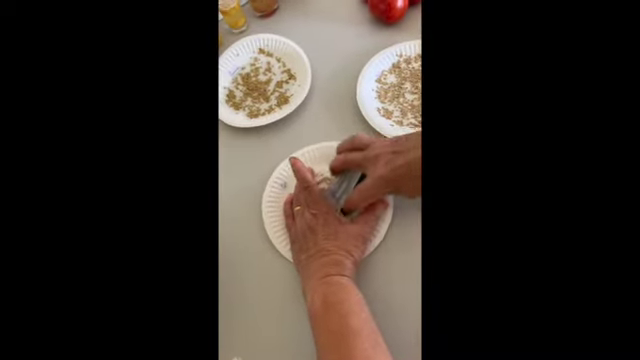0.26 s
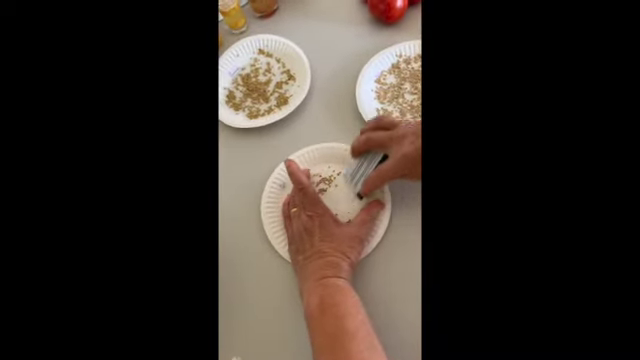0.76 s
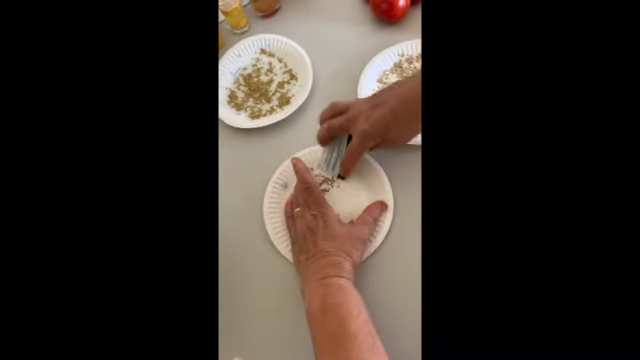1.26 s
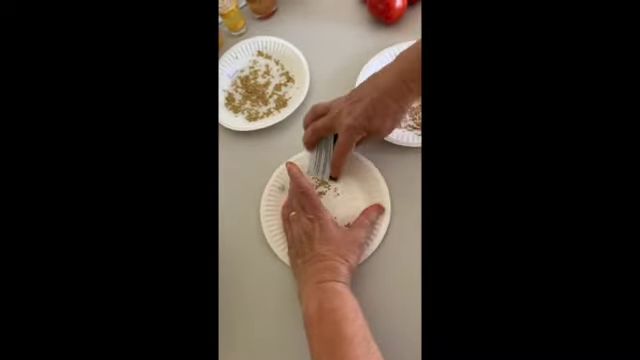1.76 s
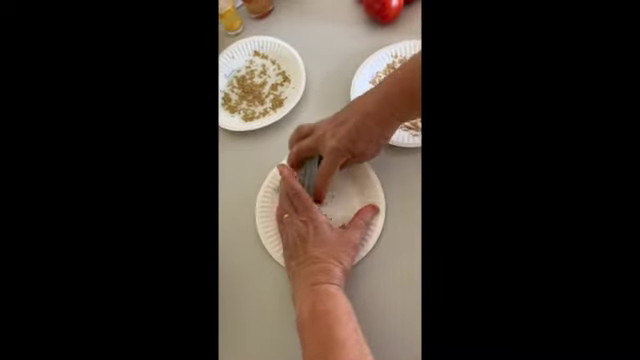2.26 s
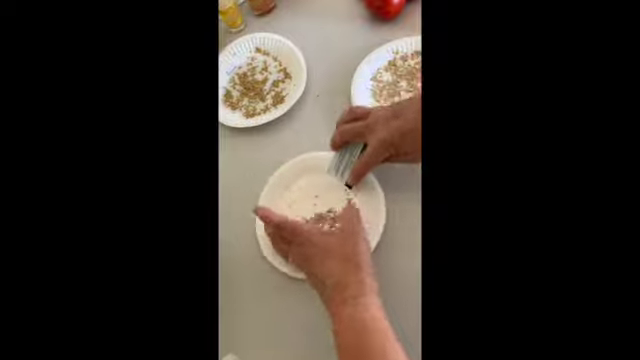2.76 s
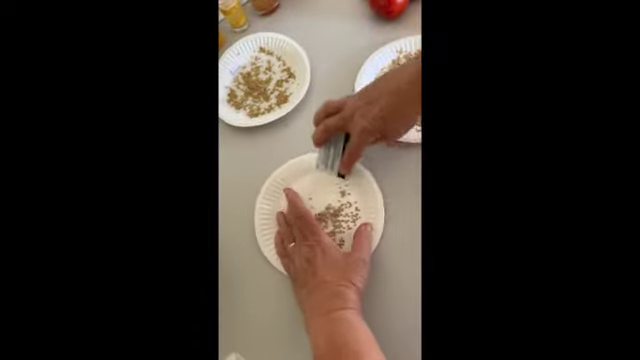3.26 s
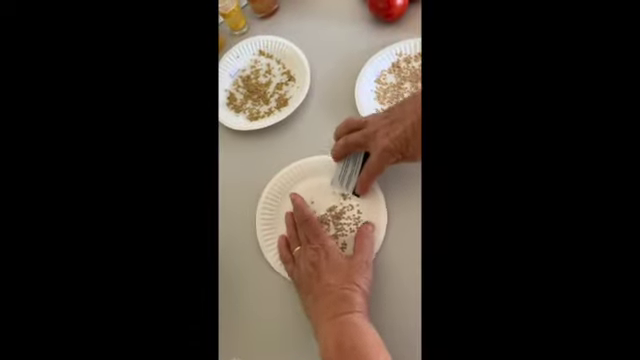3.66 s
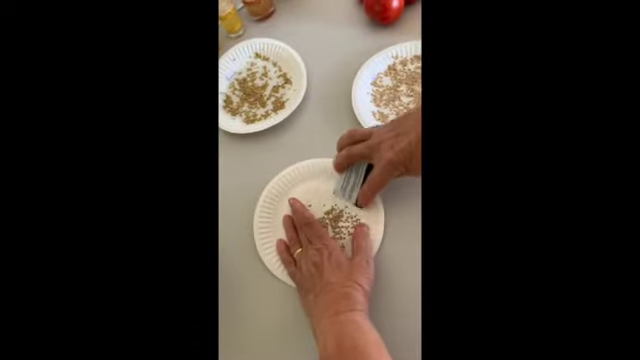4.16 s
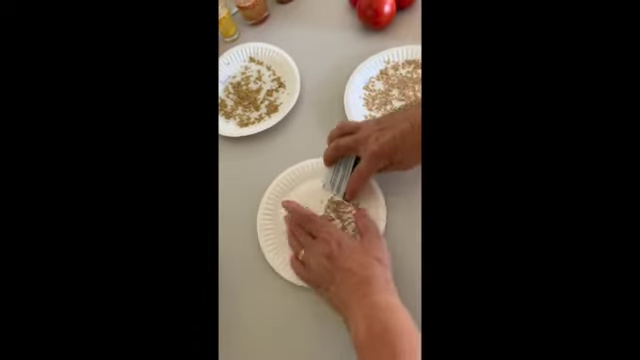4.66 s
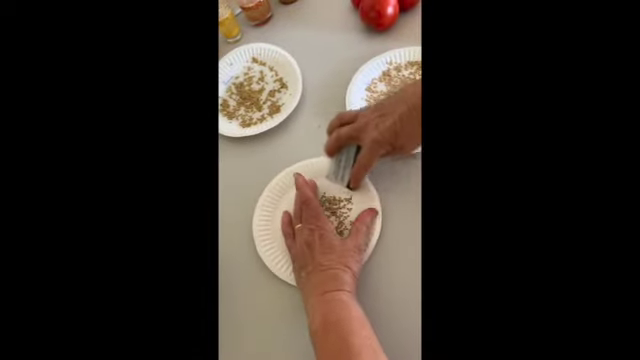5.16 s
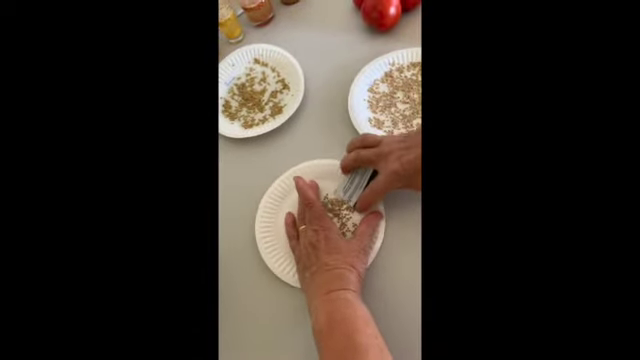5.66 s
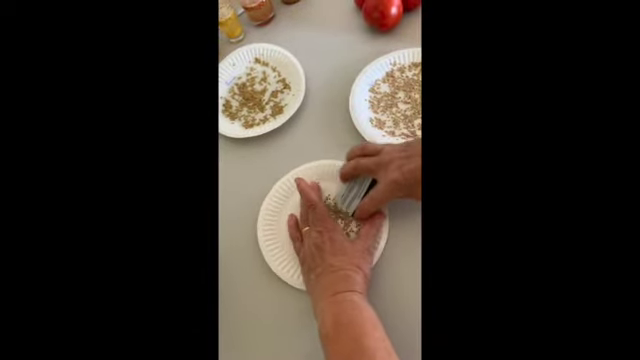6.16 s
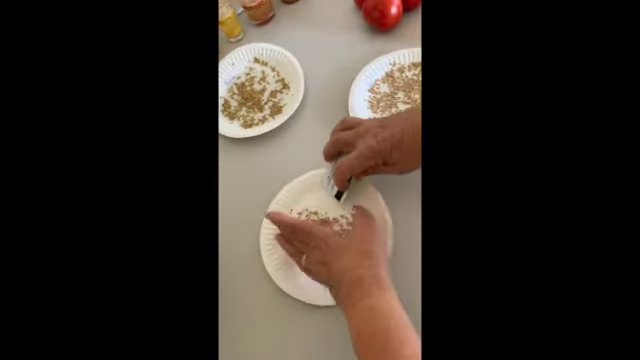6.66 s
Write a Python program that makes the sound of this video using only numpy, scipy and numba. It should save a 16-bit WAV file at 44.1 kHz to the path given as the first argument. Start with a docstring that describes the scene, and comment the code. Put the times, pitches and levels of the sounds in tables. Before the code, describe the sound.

Brisk raspy card scrapes on a paper plate, dried seeds cracking loose and the plate thudding on a table, then lighter strokes, then firm ones again.

```python
"""In a small, quiet, faintly humming room a stiff plastic card rests on a paper plate, held on a table by a hand.
First come brisk strokes: tiny slips hiss at the card's edge, coarser catches rasp in the paper, and some slips
lock into brief squeaks. As the edge ploughs into dried seeds the plate thuds, the card knocks, seeds snap loose
and the plate thumps back. From about 2.4 s most strokes are lighter and some make the plate groan; firm ones
return from 5.5 s, and light ones end it. Filtered noise and short sines make all layers; a close phone hears them."""
import sys
import numpy as np
from scipy import signal
from scipy.fft import rfft, irfft, next_fast_len
from scipy.io import wavfile
from scipy.ndimage import uniform_filter1d
from numba import njit

SR = 44100
rng = np.random.default_rng(int(sys.argv[2]) if len(sys.argv) > 2 else 0)


def bounce(signal):
    """Save signal as a 16-bit WAV file at the path given by the first command-line argument."""
    frames = np.transpose(np.atleast_2d(signal))
    limited = np.clip(frames, -1, 1)
    pcm = np.round(limited * 32767).astype(np.int16)
    wavfile.write(sys.argv[1], SR, pcm)


N = 304851
TIME_S = np.arange(N) / SR


def undb(db):
    """Decibels to gain."""
    return 10 ** (np.asarray(db) / 20)


def unit(x):
    """Scale to rms 1."""
    return x / np.sqrt(np.mean(x ** 2) + 1e-18)


def add(track, start_s, sound):
    """Mix a sound into a track at a given time."""
    i = max(int(start_s * SR), 0)
    track[i:i + len(sound)] += sound[:max(N - i, 0)]


def contour(points, hz):
    """Read (Hz, dB) points on a log-frequency axis."""
    point_hz, db = np.transpose(points)
    return np.interp(np.log(hz + 1), np.log(point_hz), db)


def colour(x, points, tilt_db=0):
    """Minimum-phase filter with the given spectrum; 0.056 of the tilt applies up to 4.5 kHz, 0.95 from 13 kHz."""
    size = next_fast_len(len(x) + 2048, real=True) // 2 * 2
    hz = np.fft.rfftfreq(size, 1 / SR)
    db = contour(points, hz) + tilt_db * contour([(4500, 0.056), (13000, 0.95)], hz)
    # folding the cepstrum makes the filter causal
    cepstrum = irfft(np.log(undb(db)))
    cepstrum[1:size // 2] *= 2
    cepstrum[size // 2 + 1:] = 0
    response = np.exp(rfft(cepstrum))
    return irfft(rfft(x, size) * response, size)[:len(x)]


def resonate(x, hz, width_hz):
    """One resonance, gain 1 at its centre."""
    return signal.lfilter(*signal.iirpeak(hz, hz / width_hz, SR), x)


@njit
def sweep(x, hz, width_hz):
    """A resonance whose centre moves: state-variable band-pass, gain 1 at the centre."""
    y, band, low = np.empty(len(x)), 0., 0.
    for i in range(len(x)):
        g, k = np.tan(np.pi * hz[i] / SR), width_hz / hz[i]
        v = (band + g * (x[i] - low)) / (1 + g * (g + k))
        band, low, y[i] = 2 * v - band, low + 2 * g * v, k * v
    return y


def walk(rate_per_s):
    """Smooth random drift about 0 with a standard deviation near 0.3."""
    k = max(int(SR / rate_per_s), 2)
    steps = np.repeat(rng.standard_normal(N // k + 1), k)[:N]
    return 0.36 * uniform_filter1d(steps, k)


def slips(rate_per_s, spread_db, size=N):
    """Tiny slips at random moments; a positive spread makes a few large, a negative one makes a few small."""
    happens = rng.random(size) < rate_per_s / SR
    force = undb(spread_db * np.minimum(rng.exponential(size=size), 4))
    return unit(happens * force * rng.standard_normal(size))


def card_ring(t60_s, tick, size=2048):
    """The card's answer to one slip: a sharp tick, then a dense, short ring."""
    decay = undb(-60 * np.arange(size) / SR / t60_s)
    response = unit(rng.standard_normal(size) * decay) / np.sqrt(size)
    response[0] += tick
    return response


def moving_contact(grit, t60_s, size=4096):
    """The card rings a little differently at each spot that the contact passes."""
    out, fade = np.zeros(N), np.sqrt(np.hanning(size))
    padded = np.pad(grit, (0, size))
    for i in range(0, N, size // 2):
        spot = padded[i:i + size] * fade
        add(out, i / SR, signal.fftconvolve(spot, card_ring(t60_s, tick=0.33)))
    return out


# Rumble spectrum. Each row: frequency in Hz, level in dB per Hz.
RUMBLE_COLOUR = [(25, -10), (50, 5), (90, -1.5), (150, -8), (290, -6), (450, -16), (900, -25.5),
                 (2200, -35.5), (5000, -54), (15500, -87)]
# Faint hum of a household appliance. Each row: frequency in Hz, mean level in dB rms.
APPLIANCE_HUM = [(101, -68), (151, -63), (204, -65.5), (253, -69), (297, -70)]


def room_tone():
    """Low rumble, largely shared by both microphones, plus hum partials that waver in level and phase."""
    common = unit(colour(rng.standard_normal(N), RUMBLE_COLOUR)) * undb(0.51 * walk(1.48))
    own = np.array([unit(colour(rng.standard_normal(N), RUMBLE_COLOUR)) for _ in range(2)])
    hum = np.zeros(N)
    for hz, db in APPLIANCE_HUM:
        level = np.sqrt(2) * undb(db + 0.74 * walk(3.2))
        hum += level * np.sin(2 * np.pi * hz * TIME_S + walk(5.6))
    return undb(-56) * (common + 0.46 * own) + hum


def slide(start_s, length_s):
    """One pass of the hand: the card speeds up and slows down again; loudness grows with speed."""
    progress = np.clip((TIME_S - start_s) / length_s, 0, 1)
    return 4 * progress * (1 - progress)


RISE_SHARE, FADE_FROM_SHARE, CRUNCH_T60_S = 0.42, 0.095, 0.31  # shares of the ploughing time


def crunch(start_s, length_s):
    """Friction builds as seeds pile up before the edge; a decay sets in during the rise and outlasts it."""
    t = TIME_S - start_s
    rise = np.clip(t / (RISE_SHARE * length_s), 0, 1)
    faded = np.clip((t - FADE_FROM_SHARE * length_s) / CRUNCH_T60_S, 0, 2)
    return rise * undb(-60 * faded)


# The card runs up over bare paper, ploughs into seeds and shoves the plate.
# Each row: meets the seeds in s, run-up in s, ploughing in s, plate's lowest bend in Hz, thud in dB,
# hollow knock in dB, sliding hiss in dB, crunch in dB, pitch of the card's edge in Hz.
STROKE_PASSES = [(.076, 0.091, 0.032, 123, -32.5, -35.5, -35, -28.5, 3430),
                 (.395, 0.084, 0.048, 114, -32.5, -36, -34, -30, 3020),
                 (0.828, 0.074, 0.087, 107, -52.5, -61, -49.5, -51, 5700),
                 (1.128, .1, 0.052, 100, -26.5, -36.5, -43, -27.5, 5630),
                 (1.433, 0.069, 0.029, 125, -32, -37, -35.5, -37, 5600),
                 (1.696, 0.04, 0.066, 107, -31, -33, -34.5, -24, 5600),
                 (1.997, 0.064, 0.024, 82, -32, -37.5, -32, -26, 6060),
                 (2.526, 0.14, 0.037, 109, -63, -55, -44.5, -61, 5650),
                 (2.928, 0.035, 0.02, 84, -56.5, -63, -55.5, -70, 5440),
                 (3.21, 0.17, 0.031, 137, -45.5, -55.5, -52.5, -64, 5450),
                 (3.283, 0.12, 0.095, 131, -42.5, -40, -46, -62, 5450),
                 (3.348, 0.06, 0.033, 99, -39, -39.5, -39.5, -47, 5300),
                 (3.614, 0.049, 0.039, 74.4, -40.5, -46, -40.5, -42, 4170),
                 (3.921, 0.057, 0.042, 99, -41.5, -45, -38, -39.5, 6100),
                 (4.232, 0.081, 0.034, 78.6, -37, -43.5, -40, -31.5, 5750),
                 (4.54, 0.032, 0.013, 123, -46, -51, -47, -72, 4250),
                 (5.231, 0.045, 0.025, 121, -45, -50, -41.5, -43.5, 5100),
                 (5.51, 0.056, 0.043, 90, -31.5, -39.5, -40, -26.5, 4900),
                 (5.83, 0.066, 0.05, 78.5, -32, -40.5, -35, -28, 4330),
                 (6.1, 0.061, 0.066, 99, -32.5, -40.5, -38.5, -28, 6250),
                 (6.4, 0.032, 0.036, 102, -43.5, -53.5, -57, -68, 5460),
                 (6.871, 0.012, 0.027, 94, -49, -55, -43.5, -67, 4070)]
# The card is drawn back, or brushes lightly over the paper.
# Each row: start in s, length in s, hiss in dB, rasp of the plate in dB, pitch of the card's edge in Hz.
SWEEP_PASSES = [(0.177, 0.14, -38.5, -48, 5800), (0.459, 0.2, -43.5, -50, 5400),
                (0.88, 0.17, -54.5, -67, 5930), (1.217, 0.15, -39.5, -47, 5800),
                (1.51, 0.15, -47.5, -50.5, 5700), (1.842, 0.11, -39.5, -43, 6330),
                (2.106, .19, -48, -53.5, 6140), (2.287, 0.12, -44.5, -55, 5800),
                (2.377, 0.3, -46, -74, 5900), (2.596, 0.36, -54, -68.5, 5340),
                (2.925, 0.13, -57, -67, 5640), (3.405, 0.17, -50.5, -53, 4400),
                (3.736, 0.13, -45.5, -52, 6600), (4.019, 0.13, -44.5, -50.5, 6100),
                (4.349, 0.25, -43.5, -53, 4250), (4.522, 0.14, -41, -77, 4000),
                (4.636, 0.15, -58, -67.5, 4300), (4.845, 0.12, -59.5, -70, 3800),
                (4.942, 0.25, -45, -57.5, 4020), (5.336, 0.11, -52.5, -59.5, 5160),
                (5.641, 0.13, -44.5, -50, 4730), (5.918, 0.13, -47.5, -50.5, 4850),
                (6.127, 0.11, -41, -46.5, 6560), (6.25, 0.19, -40.5, -53.5, 5640),
                (6.391, 0.16, -38, -58.5, 5240), (6.489, 0.17, -49.5, -71, 4900),
                (6.736, 0.029, -60, -74, 3900)]
RESTING_HISS_DB, RESTING_RASP_DB = -67, -92  # the card never lies quite still
FOLLOW_THROUGH_S = 0.03  # the card slides on after ploughing
RUN_UP_RASP_DB = -7.5  # against the run-up's hiss
RASP_EXPONENT = 0.65  # in a sweep the rasp swells less than the hiss
TURN_S = 0.02  # the hand eases in and out of each sweep


def friction():
    """Levels of the edge's hiss and the plate's rasp in dB; all passes add in power."""
    hiss, rasp = undb(RESTING_HISS_DB) ** 2, undb(RESTING_RASP_DB) ** 2
    for meets_s, run_up_s, plough_s, _, _, _, slide_db, crunch_db, _ in STROKE_PASSES:
        sliding = undb(slide_db) * slide(meets_s - run_up_s, run_up_s + plough_s + FOLLOW_THROUGH_S)
        ploughing = undb(crunch_db) * crunch(meets_s, plough_s)
        hiss = hiss + sliding ** 2 + ploughing ** 2
        rasp = rasp + (undb(RUN_UP_RASP_DB) * sliding) ** 2 + ploughing ** 2
    for start_s, length_s, hiss_db, rasp_db, _ in SWEEP_PASSES:
        sliding = np.abs(uniform_filter1d(slide(start_s, length_s), int(TURN_S * SR)))
        hiss = hiss + (undb(hiss_db) * sliding) ** 2
        rasp = rasp + (undb(rasp_db) * sliding ** RASP_EXPONENT) ** 2
    return 10 * np.log10(hiss), 10 * np.log10(rasp)


def edge_pitch():
    """The grip sets the pitch of the card's free edge for each pass; it glides from one to the next."""
    grips = [(meets_s, hz) for meets_s, *_, hz in STROKE_PASSES]
    grips += [(start_s + length_s / 2, hz) for start_s, length_s, *_, hz in SWEEP_PASSES]
    return np.interp(TIME_S, *np.transpose(sorted(grips)))


# Spectrum of the edge's hiss. Each row: frequency in Hz, level in dB per Hz.
EDGE_HISS_COLOUR = [(900, -24), (2150, -8), (2900, 0), (4500, -1), (6500, -1.5), (9000, -3), (11000, -6.5),
                    (15500, -10)]


def edge_hiss(hiss_db):
    """Slips of the edge ring the card; a light touch sounds its free edge, pressure brightens it."""
    unevenness = undb(1.4 * walk(140) + 1.2 * walk(30))
    hiss = moving_contact(slips(3000, spread_db=3.3) * unevenness, t60_s=0.061)
    hiss = hiss / np.sqrt(uniform_filter1d(hiss ** 2, 1800) + 1e-9)  # even out the level over 41 ms
    edge = unit(sweep(hiss, edge_pitch(), width_hz=470.0))
    pressure = np.clip((hiss_db + 56.5) / 22, 0, 1)
    light = unit(unit(colour(hiss, EDGE_HISS_COLOUR, tilt_db=-1.5)) + 0.5 * edge)
    hard = unit(unit(colour(hiss, EDGE_HISS_COLOUR, tilt_db=1.5)) + 0.2 * edge)
    return ((1 - pressure) * light + pressure * hard) * undb(hiss_db)


# Spectrum of seed ticks and snaps. Each row: frequency in Hz, level in dB per Hz.
SEED_COLOUR = [(250, 9.5), (700, -4), (1500, 5.5), (2250, -1.5), (2900, 5), (6000, 8.5), (10000, 4),
               (15500, 1.5)]


def loose_seeds(hiss_db):
    """Freed seeds tumble ahead of the card and tick on the paper; they stand out most under a light touch."""
    ticks = moving_contact(slips(70, spread_db=2), t60_s=0.014)
    level_db = np.interp(hiss_db, [-66, -45, -25], [-70, -52.5, -38])
    return unit(colour(ticks, SEED_COLOUR, tilt_db=-7)) * undb(level_db)


# Higher resonances of the paper. Each row: mean frequency in Hz, width in Hz, level in dB.
PAPER_RESONANCES = [(453, 114, 11.5), (755, 70, 7.5), (830, 40, 10), (1042, 133, 7), (1249, 52, 11),
                    (1416, 41, 14.5), (1535, 213, 8.5), (1858, 160, 8.5), (1956, 164, 7)]


def paper(x):
    """Drive the paper's resonances, which wander as the card moves and presses; neighbours swing oppositely."""
    out = np.zeros(len(x))
    for k, (hz, width_hz, db) in enumerate(PAPER_RESONANCES):
        wandering_hz = hz * (1 + 0.042 * walk(6.8))
        out += (-1) ** k * undb(db) * sweep(x, wandering_hz, float(width_hz))
    return out


# Bending modes of the held plate. Each row: frequency in Hz, width in Hz, level in dB.
BENDING_MODES = [(206, 12, 0), (256, 18, 0), (297, 14, 7), (330, 24, -6), (366, 20, -14), (512, 18, -6),
                 (540, 10, 3), (583, 10, -1), (622, 12, -5), (714, 24, -7), (853, 22, -5), (1083, 24, -6),
                 (1415, 40, -11), (1570, 25, -11), (1979, 40, -15)]


def bend(x):
    """Drive the plate's bending modes in parallel."""
    return sum(undb(db) * resonate(x, hz, width_hz) for hz, width_hz, db in BENDING_MODES)


def paper_rasp(rasp_db):
    """Coarser catches flutter in level; they sound the paper and keep the whole plate murmuring."""
    catches = slips(900, spread_db=1) * undb(3 * walk(70))
    rasp = unit(paper(catches))
    rocking = unit(resonate(resonate(catches, 114, 76), 100, 81))
    bending = unit(resonate(bend(catches), 242, 106))
    murmur_db = np.minimum(rasp_db, -49) + 5  # the murmur stops growing under a strong rasp
    return rasp * undb(rasp_db) + (0.82 * rocking + 0.57 * bending) * undb(murmur_db)


# The edge sticks and slips evenly for a moment; the loud row at 0.402 s is instead the card ringing as a seed
# snaps. # Each row: start in s, length in s, mean pitch in Hz, peak level in dB, unsteadiness in Hz (the
# pitch's standard deviation is about 0.6 of it).
EDGE_SQUEAKS = [(.01, 0.1, 3230, -36, 110), (.402, .022, 2980, -22.5, 90), (1.23, 0.064, 5420, -40, 50),
                (1.487, .07, 5450, -40, 30), (1.5, 0.047, 3490, -48, 70), (1.516, .06, 9798, -53, 70),
                (3.757, 0.053, 6430, -46, 170), (3.886, .085, 6600, -42, 240),
                (4.042, 0.11, 6680, -47, 260), (4.172, .07, 6550, -39, 280), (5.645, 0.065, 5400, -48, 90)]


def squeaks():
    """Brief whistles of the card's edge, some pure, some hoarse: sines with a jittering pitch."""
    out = np.zeros(N)
    for start_s, length_s, hz, db, unsteady_hz in EDGE_SQUEAKS:
        size = int(length_s * SR)
        swell = np.hanning(size) * undb(2 * walk(400)[:size])
        pitch_hz = hz + 2 * unsteady_hz * walk(1200)[:size]
        add(out, start_s, undb(db) * swell * np.sin(2 * np.pi * np.cumsum(pitch_hz) / SR))
    return out


SETTLING_SHARE, SETTLING_T60_S = 0.49, 0.34  # share of the push that lingers, and its decay


def shoves():
    """The card judders over the seeds and rocks the plate: jolts drive its lowest bends and a hollow knock."""
    out = np.zeros(N)
    t = np.arange(SR // 3) / SR
    for start_s, _, plough_s, bend_hz, thud_db, knock_db, *_ in STROKE_PASSES:
        progress = np.minimum(t / plough_s, 1)
        # the push builds fast; afterwards the plate settles under the hand
        settling = SETTLING_SHARE * progress * undb(-60 * np.maximum(t - plough_s, 0) / SETTLING_T60_S)
        push = np.sin(np.pi * progress ** 0.8) ** 2 + settling
        jolts = push * slips(630, spread_db=-1, size=len(t))
        thud = resonate(resonate(resonate(jolts, bend_hz, 81), 62, 117), 70, 190)
        thud += 0.42 * resonate(resonate(jolts, 127.8, 14), 134, 42)
        knock = resonate(bend(jolts), 264, 254)
        add(out, start_s, unit(thud) * undb(thud_db) + unit(knock) * undb(knock_db))
    return out


# Clack spectrum. Each row: frequency in Hz, level in dB per Hz.
CLACK_COLOUR = [(90, -25), (170, -19), (290, 13.5), (400, -12.5), (500, 0), (700, -6.5), (1100, -6),
                (1600, 3), (2050, -5), (2700, -3), (15500, -21)]
# The card bumps into a clump that holds, and knocks the plate.
# Each row: time in s, level in dB, hardness of the contact as its top frequency in Hz.
CLUMP_KNOCKS = [(.078, -34, 1200), (.094, -25, 710), (.103, -29.5, 900), (0.39, -33, 300),
                (0.422, -24, 700), (.431, -31.5, 594), (1.121, -37, 400), (1.136, -34.5, 1800),
                (1.147, -27, 2200), (1.157, -25.5, 1080), (1.168, -35, 696), (1.442, -38, 1300),
                (1.451, -34, 1300), (1.466, -32, 704), (1.701, -32.5, 1800), (1.71, -28, 1690),
                (1.719, -31, 700), (1.731, -29.5, 1190), (1.74, -27, 900), (1.75, -32, 895),
                (1.764, -39, 700), (1.997, -31.5, 2400), (2.009, -27, 1930), (2.031, -26.5, 2420),
                (2.04, -32, 1410), (2.436, -48.5, 3000), (3.21, -52, 2400), (3.291, -36.5, 280),
                (3.35, -37.5, 1070), (3.364, -42, 880), (3.621, -37, 900), (3.932, -55, 900),
                (3.955, -44.5, 1800), (3.977, -44, 1590), (4.241, -41.5, 1200), (4.276, -38.5, 1200),
                (4.331, -45, 900), (4.546, -40, 940), (5.216, -46, 900), (5.505, -36.5, 1000),
                (5.518, -34, 2400), (5.547, -35, 2200), (5.532, -31.5, 2010), (5.558, -35.5, 2100),
                (5.819, -37.5, 1400), (5.85, -34, 900), (5.869, -33.5, 1400), (6.109, -33, 1100),
                (6.124, -34.5, 900), (6.133, -35.5, 1400), (6.881, -43, 367)]


def knocks(size=8192):
    """A single blow gives a papery clack and leaves the plate ringing; a softer contact is duller."""
    out = np.zeros(N)
    for start_s, db, top_hz in CLUMP_KNOCKS:
        clack = unit(colour(card_ring(t60_s=0.051, tick=0.4, size=size), CLACK_COLOUR))
        body = unit(bend(signal.unit_impulse(size)))
        softness = signal.butter(2, top_hz, fs=SR)
        blow = signal.lfilter(*softness, clack + undb(-2) * body)
        add(out, start_s, blow / np.std(blow[:size // 4]) * undb(db))
    return out


# Seeds snap loose or tick against the card. Each row: time in s, level of the crack in dB, treble tilt in dB.
SEED_SNAPS = [(0.0879, -29.5, -10), (0.102, -34.5, -20), (0.409, -26, -14), (0.417, -32, -18),
              (0.424, -33, -1), (0.447, -38, -8), (0.622, -44, -1), (0.678, -55, -12), (0.767, -47.5, -9),
              (0.821, -53.5, -18), (1.135, -33.5, 6), (1.146, -27.5, 5), (1.1564, -23.5, -5),
              (1.4527, -36, -4), (1.467, -35, -8), (1.7091, -28, 3), (1.733, -31, -1), (1.819, -53.5, -8),
              (2.031, -31.5, -10), (2.04, -30.5, 5), (2.1486, -55, -2), (2.435, -39.5, -13),
              (2.8063, -63, 4), (2.814, -66, 0), (2.883, -54.5, -6), (3.21, -43.5, -9), (3.2288, -36, 10),
              (3.351, -42.5, -9), (3.415, -48.5, 6), (3.5625, -60, 0), (3.5736, -45.5, -24), (3.6, -63, 1),
              (3.6197, -41.5, 6), (3.978, -58, -16), (3.9924, -43.5, 21), (4.2378, -25, 3.5),
              (4.2733, -27.5, 7.5), (4.548, -42, 8), (4.622, -50, 1), (5.467, -43.5, -7), (5.517, -25.5, 3),
              (5.5313, -31, -5), (5.5475, -30.5, -6), (5.5531, -24.5, 8), (5.5592, -34, -1),
              (5.849, -57, 0), (5.8693, -26, 4), (6.1114, -37, 12), (6.265, -42.5, -15), (6.405, -36.5, 5),
              (6.89, -46, -7)]


def snaps():
    """Each seed lets go at once; the card springs back with a crack and flicks the plate."""
    out = np.zeros(N)
    for start_s, db, tilt_db in SEED_SNAPS:
        crack = colour(card_ring(t60_s=0.016, tick=0.45), SEED_COLOUR, tilt_db)
        add(out, start_s, unit(crack) * undb(db))
    return out + 0.26 * bend(out)


# The seeds give way and the plate rocks back against the table. Each row: time in s, level in dB, pitch in Hz.
PLATE_THUMPS = [(.1, -16.5, 106), (.421, -15.5, 104), (1.15, -9, 88.3), (1.462, -13, 105),
                (1.721, -13, 103), (2.004, -18.5, 106), (2.044, -12, 76.5), (3.375, -25, 78),
                (3.411, -27, 84), (3.646, -22.5, 69), (3.937, -26, 72), (4.2427, -17.5, 66.3),
                (4.2728, -23.5, 71.6), (4.563, -31.5, 110), (5.265, -28, 110), (5.548, -16.5, 79),
                (5.882, -14, 80.7), (6.123, -15, 89.4), (6.147, -17, 85), (6.416, -31.5, 80),
                (6.886, -31, 100)]
THUMP_RISE_S, THUMP_T60_S = 0.0023, 0.16
RIM_HZ, RIM_DB, RIM_T60_S = 133.8, -13.5, 0.34  # level against the thump


def thumps():
    """One short, low ring each time the plate is let go; its rim flaps along at a fixed pitch."""
    out = np.zeros(N)
    t = np.arange(SR // 2) / SR
    rise = 1 - np.exp(-t / THUMP_RISE_S)
    rim = np.sin(2 * np.pi * RIM_HZ * t) * undb(RIM_DB - 60 * t / RIM_T60_S)
    for start_s, db, hz in PLATE_THUMPS:
        rock = np.sin(2 * np.pi * hz * t) * undb(-60 * t / THUMP_T60_S)
        add(out, start_s, undb(db) * rise * (rock + rim))
    return out


# The card chatters in step with the plate. Each row: start in s, length in s, mean pitch in Hz, level in dB.
PLATE_GROANS = [(2.525, .075, 300, -37), (3.285, 0.09, 283.2, -29.5), (3.33, .11, 239.6, -30),
                (4.545, 0.021, 293, -44), (6.88, 0.051, 268, -33)]


def groans():
    """Slow stick and slip locks to a bend of the plate: a wavering sine and octave swell fast and fade."""
    out = np.zeros(N)
    for start_s, length_s, hz, db in PLATE_GROANS:
        size = int(length_s * SR)
        swell = np.sin(np.pi * np.sqrt(np.arange(size) / size))
        pitch_hz = hz * (1 + 0.05 * walk(88)[:size])
        phase = 2 * np.pi * np.cumsum(pitch_hz) / SR
        add(out, start_s, undb(db) * swell * (np.sin(phase) + undb(-24) * np.sin(2 * phase)))
    return out


# Phase by which the left microphone leads. Each row: frequency in Hz, phase in radians.
LEFT_LEAD = [(0, 0), (1500, 0), (2200, .6), (2380, 2.5), (2900, 1.2), (3800, 1.6), (4800, 3.14),
             (9000, 9.4), (13250, 15.7), (16000, 19.4)]
# Left minus right. Each row: frequency in Hz, difference in dB.
LEFT_BALANCE = [(60, -1), (250, -.5), (600, -2.1), (1400, -2.8), (2200, -1.6), (2700, 0), (15000, 0)]


def microphones(x):
    """Two ports: the treble reaches the left one first, bass and middle are louder in the right."""
    hz = np.fft.rfftfreq(2 * next_fast_len(N // 2 + SR // 10), 1 / SR)
    spectrum = rfft(x, 2 * (len(hz) - 1))
    lean = undb(contour(LEFT_BALANCE, hz) / 2)
    lag = np.exp(-1j * np.interp(hz, *np.transpose(LEFT_LEAD)))
    return np.array([irfft(spectrum * lean)[:N], irfft(spectrum * lag / lean)[:N]])


def room(x, t60_s, wet_db):
    """Diffuse echoes from decaying noise; the two ports hear much the same bass but unrelated treble."""
    t = np.arange(SR // 2) / SR
    decay = undb(-60 * t / t60_s) * np.clip((t - 0.004) / 0.00033, 0, 1)  # silent for 4 ms
    mid, side = rng.standard_normal((2, len(t))) * decay
    mid = colour(mid, [(100, 3), (1500, 2), (4000, -2), (15000, -5)])
    side = colour(side, [(100, -10), (300, -1), (550, 6), (1500, 4), (4000, 0), (15000, -2)])
    responses = [unit(r) / np.sqrt(len(t)) for r in (mid + side, mid - side)]
    return undb(wet_db) * np.array([signal.fftconvolve(x, r)[:N] for r in responses])


# Colour of the microphones' treble. Each row: frequency in Hz, gain in dB.
TREBLE_COLOUR = [(2000, 0), (2500, 1.5), (3000, .5), (4200, 1), (4800, -1), (5400, .5), (6800, -.5),
                 (7600, -4), (8200, 1), (9300, -.5), (10000, 1.5), (11000, -2), (12300, 0), (15500, -1)]


def scene():
    """Card, seeds and plate at one spot on the table, their echoes, and the room's own tone."""
    hiss_db, rasp_db = friction()
    # a light touch drags unevenly
    lightness = 1 - np.clip((hiss_db + 55) / 20, 0, 1)
    rustle_db = 2.2 * walk(22) * lightness
    scraping = edge_hiss(hiss_db + rustle_db) + loose_seeds(hiss_db) + paper_rasp(rasp_db + rustle_db)
    scraping = scraping + squeaks() + groans()
    plate = scraping + shoves() + knocks() + snaps() + thumps()
    plate = colour(plate, TREBLE_COLOUR)
    return microphones(plate) + room(plate, t60_s=0.3, wet_db=-15) + room_tone()


def record(dry):
    """The phone rounds the loudest peaks, drops the deepest bass and cuts the top."""
    dry = 0.9 * np.tanh(dry / 0.9)
    dry = signal.sosfilt(signal.butter(5, 44, "high", fs=SR, output="sos"), dry)
    return signal.sosfilt(signal.ellip(8, 0.2, 70, 15800, fs=SR, output="sos"), dry)


dry = scene()
out = record(dry)
bounce(out)
```